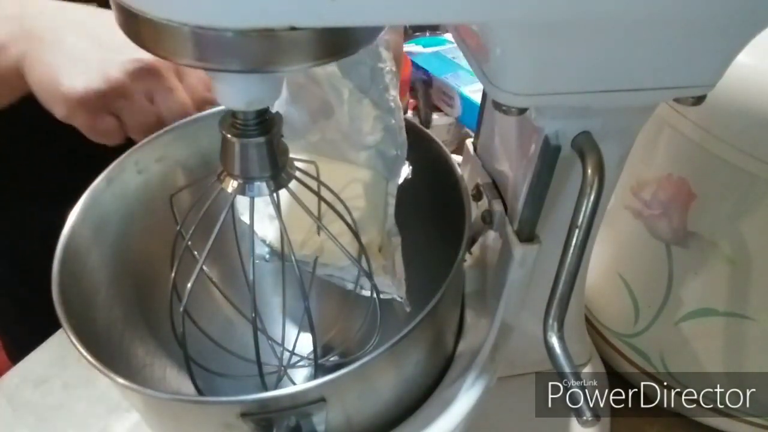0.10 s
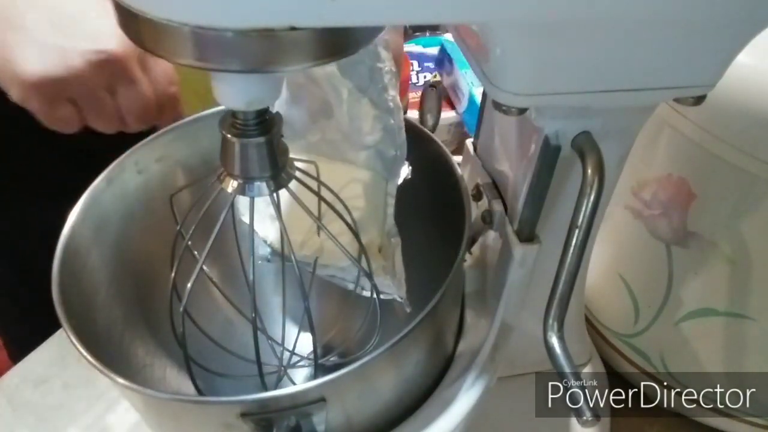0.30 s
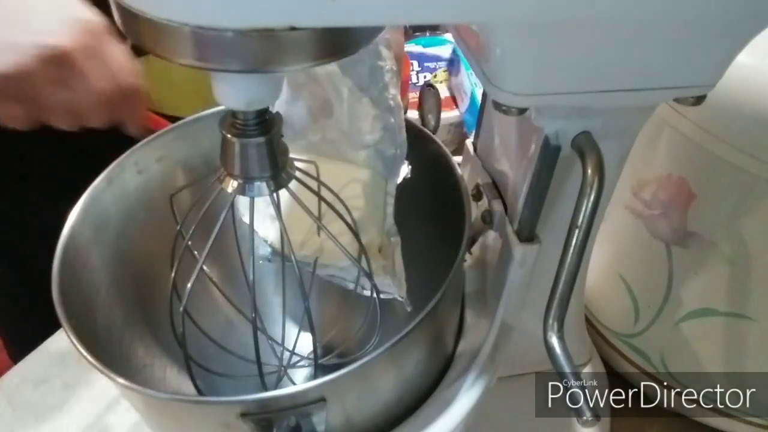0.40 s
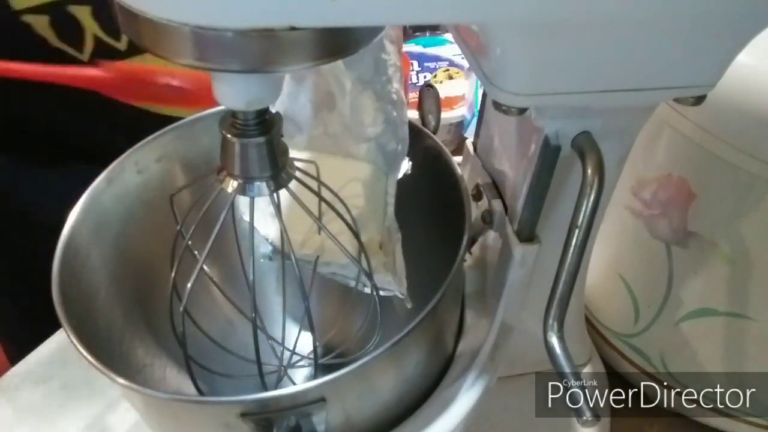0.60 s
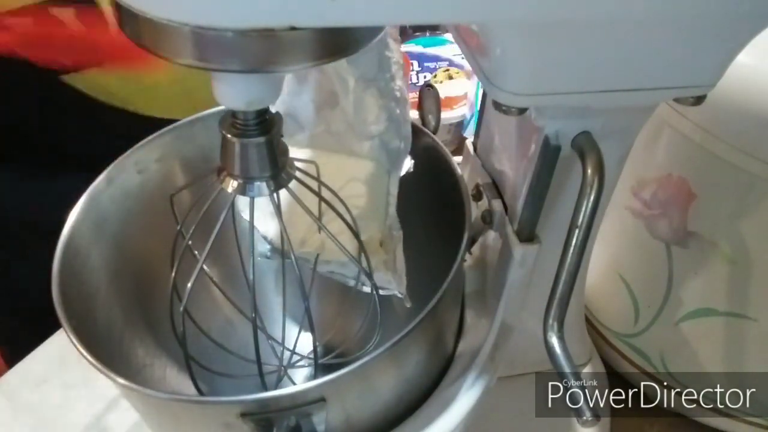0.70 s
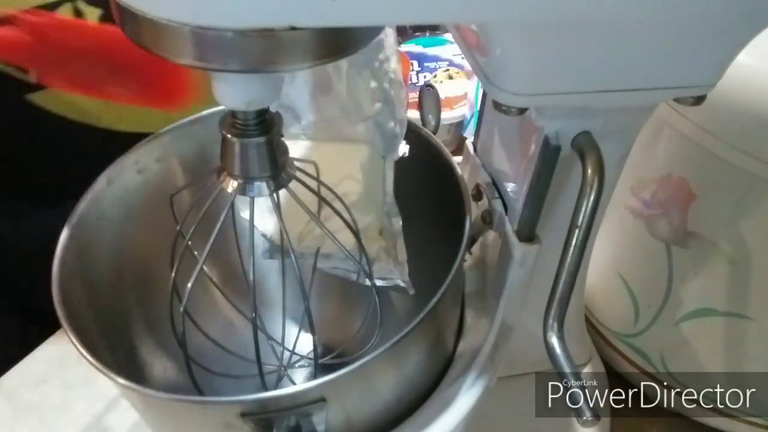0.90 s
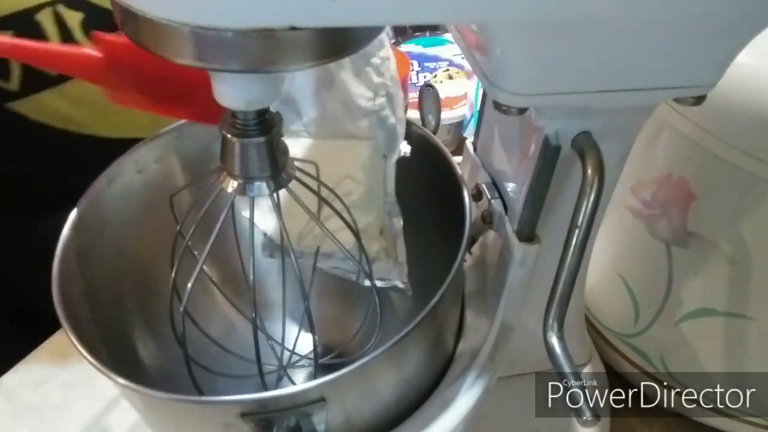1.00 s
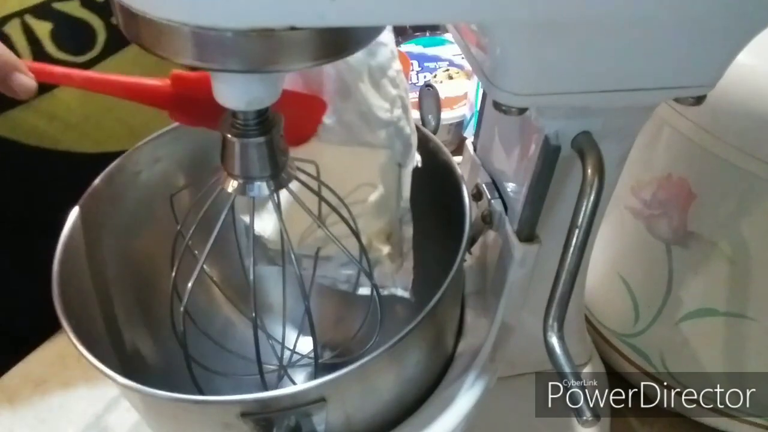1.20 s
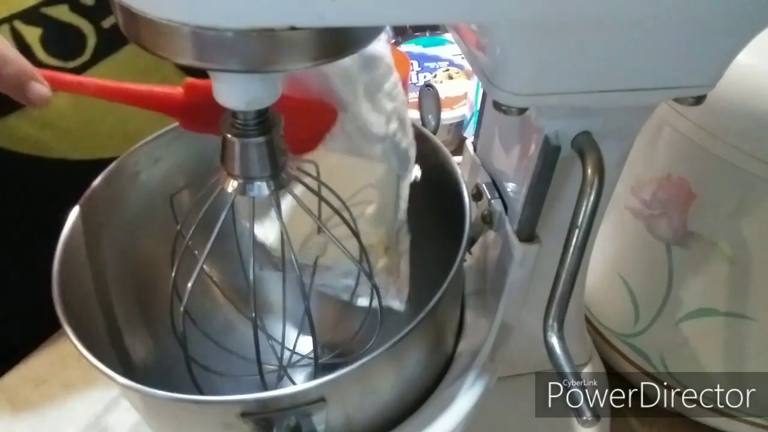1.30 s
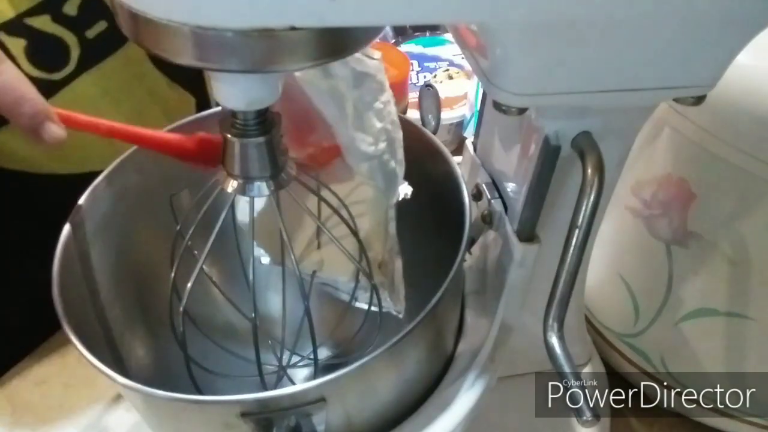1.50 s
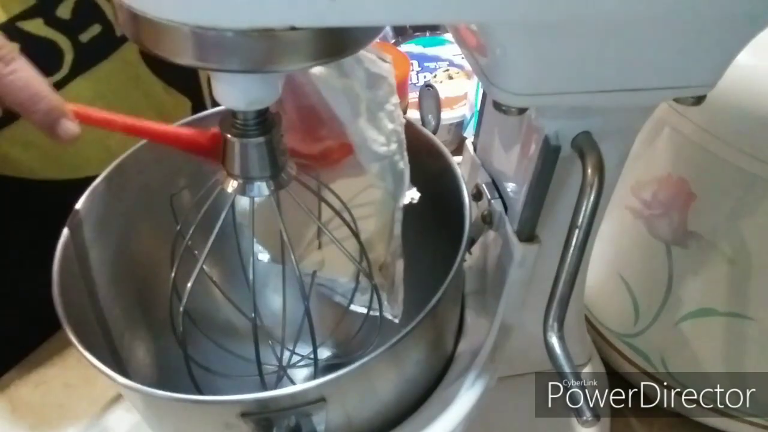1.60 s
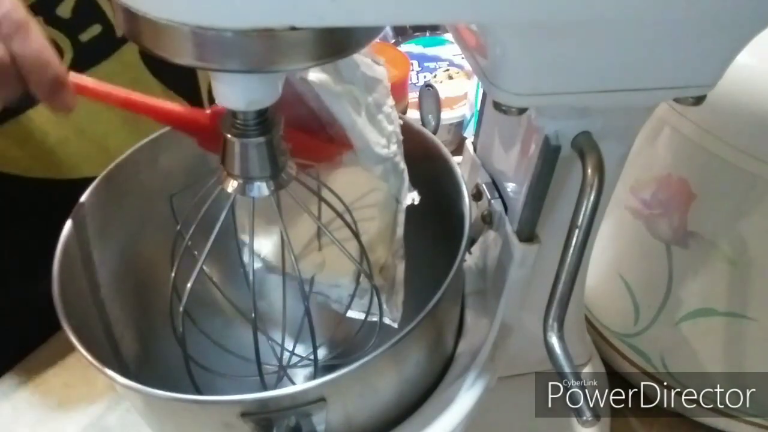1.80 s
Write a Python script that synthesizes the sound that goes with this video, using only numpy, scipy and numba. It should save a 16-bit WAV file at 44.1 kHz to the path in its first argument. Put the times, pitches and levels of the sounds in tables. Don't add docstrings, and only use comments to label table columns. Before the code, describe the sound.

Rubber spatula knocks twice on a steel mixing bowl and whisk, then taps and rustles foil

```python
import sys
import numpy as np
from scipy import signal
from scipy.fft import rfft, irfft
from scipy.io import wavfile
from numba import njit

SR = 44100
rng = np.random.default_rng(int(sys.argv[2]) if len(sys.argv) > 2 else 0)


def pcm_store(signal):
    levels = np.round(np.clip(np.atleast_2d(signal), -1, 1) * 32767)
    wavfile.write(sys.argv[1], SR, levels.astype(np.int16).T)


def field_ratio(decibels):
    return 10 ** (np.asarray(decibels, dtype=float) / 20)


N = 79380


def colour(x, points):
    hz, db = np.array(points).T
    f = np.maximum(np.fft.rfftfreq(len(x), 1 / SR), 1)
    y = irfft(rfft(x) * field_ratio(np.interp(np.log(f), np.log(hz), db)), len(x))
    return y / np.sqrt(np.mean(y ** 2))


def hump(hz, octaves, slope_db=14):
    skirt_db = -slope_db * 3 / octaves
    return [(hz / 8, skirt_db), (hz, 0), (hz * 8, skirt_db)]


def resonance_lift_db(f, table):
    return sum(db / (1 + (2 * (f - hz) / width) ** 2) for hz, width, db in table)


def modes(start_s, hz, gain, t60, phase, span=0.84):
    i = int(start_s * SR)
    t = np.arange(min(int(span * SR), N - i)) / SR
    decay = np.exp(-np.log(1000) * t / t60[:, None])
    out = np.zeros(N)
    out[i:i + len(t)] = gain @ (decay * np.sin(2 * np.pi * hz[:, None] * t + phase[:, None]))
    return out


def add(out, s, x):
    i = int(s * SR)
    out[i:i + len(x)] += x[:N - i]


# f/Hz, level/dB (per Hz)
HUSH_SPECTRUM = [(18, -45), (30, -34.5), (237, -9.5), (277, -5.5), (324, -28), (379, -15), (5890, -32.5),
                 (8720, -18.5), (15500, -35.5)]


def background():
    rumble = field_ratio(-64.5) * colour(rng.standard_normal(N), hump(55, .5))
    hush = field_ratio(-61.5) * colour(rng.standard_normal(N), HUSH_SPECTRUM)
    return rumble + hush


# t/s, level/dB
SLIDE_LEVEL = [(0, -83.5), (.12, -93), (0.152, -56), (.21, -60.5), (.75, -73), (1.07, -61.5), (1.12, -49),
               (1.169, -56), (1.216, -53), (1.281, -71.5), (1.309, -74), (1.333, -51), (1.381, -41.5),
               (1.5, -42.5), (1.57, -54), (1.63, -52.5), (1.739, -56), (1.8, -57)]
# f/Hz, level/dB (per Hz)
SLIDE_SPECTRUM = [(100, -30.5), (370, -6.5), (600, -13), (1800, -16.5), (6300, -23), (8600, -3),
                  (10500, -16), (15500, -27.5)]
# f/Hz, width/Hz, lift/dB
SLIDE_RESONANCES = [(372, 60, 6), (1060, 90, 7), (1620, 90, 7), (2050, 200, 4)]


def slide():
    grains_per_s, grain_spread_db = 13000, -0.9
    struck = rng.random(N) < grains_per_s / SR
    grains = struck * rng.standard_normal(N) * field_ratio(grain_spread_db * rng.exponential(size=N))
    friction = colour(grains + 0.11 * rng.standard_normal(N), SLIDE_SPECTRUM)
    lift = field_ratio(resonance_lift_db(np.fft.rfftfreq(N, 1 / SR), SLIDE_RESONANCES))
    s, db = np.array(SLIDE_LEVEL).T
    return irfft(rfft(friction) * lift, N) * field_ratio(np.interp(np.arange(N) / SR, s, db))


def room(x):
    low_t60_s, treble_t60_s, level_db = 0.46, 0.46, -17
    t = np.arange(SR // 2) / SR
    low = signal.lfilter([.3], [1, -.7], rng.standard_normal(len(t))) * field_ratio(-60 * t / low_t60_s)
    treble = 0.19 * rng.standard_normal(len(t)) * field_ratio(-60 * t / treble_t60_s)
    tail = (low + treble) * np.minimum(t / 0.0013, 1)
    tail /= np.sqrt(np.sum(tail ** 2))
    return field_ratio(level_db) * signal.fftconvolve(x, tail)[:N]


# t/s, peak level/dB, body f/Hz, crack level/dB, treble level/dB
TAP_EVENTS = [(0.1293, -32, 835, -22, -20), (0.1357, -28, 1358, -10.5, -16), (0.192, -36.5, 740, -20, -20),
              (0.816, -48, 1190, -20, -25), (0.8442, -31.5, 1306, -7.5, -25.5),
              (0.9038, -39.5, 1200, -10, -26.5), (.916, -51, 393, -19, -17), (0.9233, -55, 400, -5, 9),
              (1.0008, -59.5, 849, 6, 16.5), (1.0872, -43.5, 717, 0.5, 15.5), (1.0923, -34, 1000, -18, -11),
              (1.1098, -38, 1953, 1.5, 17.5), (1.1873, -41.5, 593, -12.5, -23),
              (1.239, -40.5, 600, -17, -28), (1.2478, -39.5, 1090, 3, 0), (1.3424, -39.5, 1650, -8, -11),
              (1.362, -35, 910, -14, -25), (1.4237, -25.5, 1948, -2, 2), (1.5281, -32.5, 1690, -14.5, -14),
              (1.5723, -34.5, 1042, -5.5, -33.5), (1.604, -42, 940, -20, -2), (1.635, -44, 1050, -9.5, -36),
              (1.6502, -25, 1007, -4.5, -5), (1.768, -49.5, 1000, -6.5, -2)]


def taps():
    body_t60_s, knock_t60_s, crack_t60_s, snap_t60_s = 0.018, .055, 0.035, 0.044
    attack_s, tail_db, tail_t60_s = .0005, -12.5, 0.15
    crack_spectrum = [(200, -22), (3530, 0), (6000, -8), (10500, -18), (16000, -26)]
    snap_spectrum = hump(8650, 2500 / 8650)
    t, out = np.arange(8192) / SR, np.zeros(N)
    tail = field_ratio(tail_db - 60 * t / tail_t60_s)
    attack = np.minimum(t / attack_s, 1)

    def fade(t60):
        return (field_ratio(-60 * t / t60) + tail) * attack

    cup = field_ratio(-2.5 - 60 * t / 0.043) * np.sin(2 * np.pi * 371.9 * t)
    for s, db, hz, crack_db, treble_db in TAP_EVENTS:
        noise = rng.standard_normal((3, len(t)))
        noise[:, int(attack_s * SR) + 8] -= 5.0
        body = colour(noise[0], hump(hz, 1)) * fade(body_t60_s)
        crack = colour(noise[1], crack_spectrum) * fade(crack_t60_s) * field_ratio(crack_db)
        snap = colour(noise[2], snap_spectrum) * fade(snap_t60_s) * field_ratio(treble_db)
        knock = field_ratio(-3 - 60 * t / knock_t60_s) * np.sin(2 * np.pi * hz * t)
        add(out, s, field_ratio(db - 4) * (body + knock + crack + snap + cup))
    return out


# t/s, level/dB, f/Hz where the clatter is lifted least, attack/s
KNOCK_BLOWS = [
    (.2182, -8, 1320, 0.00074),
    (.2440, -23, 1320, 0.006),
    (.4222, -19, 4750, 0.00021),
    (0.4253, -11, 1450, 0.00083),
    (.4455, -12.5, 2400, 0.0012),
]
# f/Hz, level/dB (per Hz)
CLATTER_SPECTRUM = [(35, -74), (60, -35.5), (351, -4), (2360, -3.5), (4220, -12.5), (4630, -13.5),
                    (5580, -24), (8870, -15.5), (15500, -56.5)]
# f/Hz, width/Hz, lift/dB
BOWL_RESONANCES = [(378, 23, 5.5), (650, 100, 6.5), (1000, 85, 11), (1400, 130, 12), (1760, 100, 8),
                   (2300, 200, 11), (3100, 200, 6)]


def clatter():
    t60_s, t60_slope, focus_db = 0.28, 0.009, -0.5
    t, out = np.arange(SR // 2) / SR, np.zeros(N)
    f = np.maximum(np.fft.rfftfreq(len(t), 1 / SR), 1)
    lift_db = resonance_lift_db(f, BOWL_RESONANCES)
    for s, db, least_lift_hz, attack in KNOCK_BLOWS:
        noise = colour(rng.standard_normal(len(t)), CLATTER_SPECTRUM)
        steel = rfft(noise) * field_ratio(lift_db - focus_db * np.log2(f / least_lift_hz) ** 2)
        steel /= np.std(irfft(steel))
        for hz in 62.5 * 2 ** np.arange(0, 8.5, .5):
            band = irfft(steel * np.maximum(1 - 2 * np.abs(np.log2(f / hz)), 0))
            decay = field_ratio(db - 60 * t / (t60_s * (hz / 1000) ** t60_slope))
            add(out, s, decay * np.minimum(t / attack, 1) * band)
    return out


# start t/s, hand damps it at t/s, level/dB, swell/s
KNOCK_RINGS = [
    (.2185, .423, -13, 0.0067),
    (0.429, 1.003, -13, 0.018),
]
LINE_PITCHES = [(600, 673, 1012, 1222, 1455, 2342, 2428, 8942, 10550),
                (140, 452, 722, 968, 1364, 1695, 1845, 2297, 8613)]
# level/dB, t60/s
FIRST_LINES = [(2.5, 0.12), (-12.5, 0.22), (-4, .22), (-1.5, 0.22), (-8.5, 0.22), (-5, 0.31), (-12, 0.58),
               (-10.5, 0.088), (-18, 0.17)]
# level/dB, t60/s
SECOND_LINES = [(-21, 0.1), (-16.5, 0.55), (-13, 0.44), (-13.5, 0.25), (-5.5, 0.18), (2, .2), (-6, .25),
                (5.5, .2), (-17, .15)]
# start t/s, f/Hz, beat f/Hz
MODE_PAIRS = [(.2440, 4524, 10.8), (.4260, 2350, 14.2), (.4500, 7105, 27.0), (.2185, 8627, 6.0),
              (.4455, 10550, 22.0), (.4260, 12570, 19.0), (.4455, 9500, 35.0)]
# level/dB, t60/s
PAIR_STRENGTH = [(-13, .3), (-8, .4), (-26, .3), (-6, .17), (-28, .2), (-35, .2), (-30, .12)]


def rings():
    t, out = np.arange(N) / SR, np.zeros(N)

    def damp(end):
        return np.exp(-np.maximum(t - end, 0) / .006)

    for (s, end, db, swell), lines, hz in zip(KNOCK_RINGS, (FIRST_LINES, SECOND_LINES), np.array(LINE_PITCHES)):
        line_db, t60 = np.array(lines).T
        rise = 1 - np.exp(-np.maximum(t - s, 0) / swell)
        phase = 2 * np.pi * rng.random(len(hz))
        out += rise * damp(end) * modes(s, hz, field_ratio(db + line_db), t60, phase)

    first_end = KNOCK_RINGS[0][1]
    opposed = np.array([.5, -.5])
    for (s, hz, beat), (db, t60) in zip(MODE_PAIRS, PAIR_STRENGTH):
        pair_hz = hz + beat * np.array([-.5, .5])
        pair = modes(s, pair_hz, field_ratio(db) * opposed, np.full(2, t60), np.zeros(2))
        out += pair * (damp(first_end) if s < first_end else 1)
    return out


def scene():
    near = slide() + taps() + clatter()
    return (near + rings() + room(near) + background())[None]


@njit
def limit(x, top, release):
    y, e = np.empty(len(x)), 0.
    for i in range(len(x)):
        e = max(abs(x[i]), e * (1 - release))
        y[i] = x[i] * min(1., top / (e + 1e-9))
    return y


def low_pass(x):
    return signal.sosfilt(signal.butter(12, 16530, fs=SR, output="sos"), x)


def record(dry):
    low_hz, top_hz, ceiling, release_s = 130, 15700, 0.7, 0.028
    mic = signal.sosfilt(signal.butter(2, low_hz, "high", fs=SR, output="sos"), dry[0])
    held = limit(mic, ceiling, 1 / (release_s * SR))
    mix = signal.sosfilt(signal.ellip(6, .2, 40, top_hz, fs=SR, output="sos"), held)[None]
    return low_pass(mix)


dry = scene()
out = record(dry)
pcm_store(out)
```